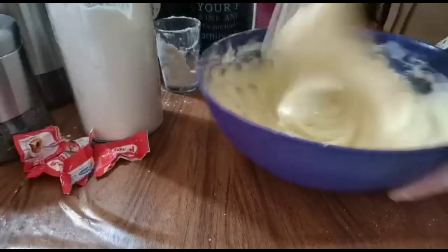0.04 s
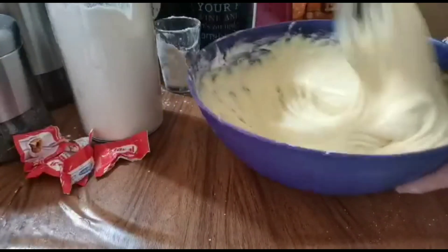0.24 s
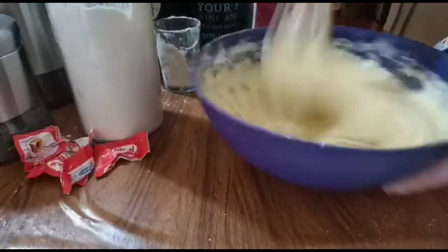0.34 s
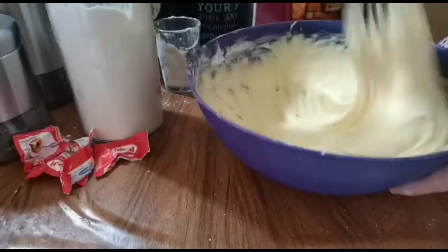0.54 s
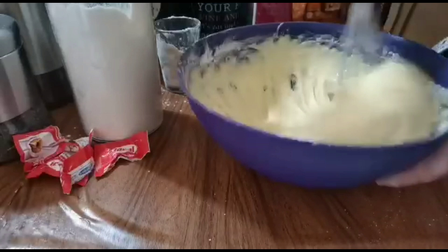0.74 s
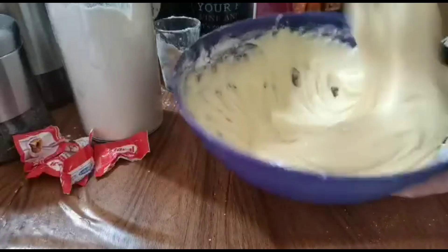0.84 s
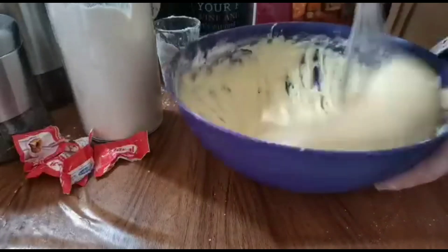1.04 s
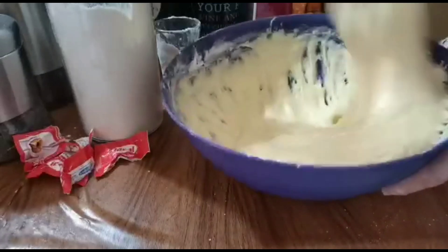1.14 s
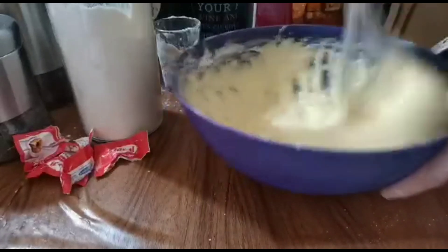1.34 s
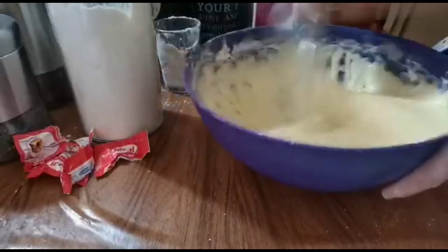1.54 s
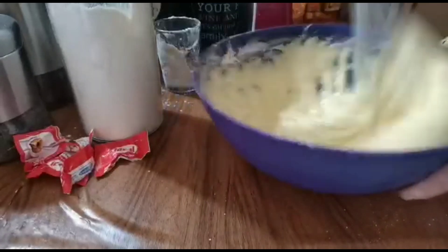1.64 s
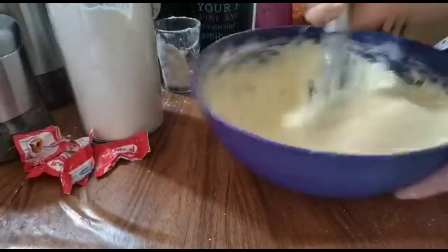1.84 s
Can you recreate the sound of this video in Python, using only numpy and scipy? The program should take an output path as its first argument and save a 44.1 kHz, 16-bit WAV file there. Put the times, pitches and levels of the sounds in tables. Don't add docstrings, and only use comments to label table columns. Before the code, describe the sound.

A wire whisk beats thick batter in a plastic bowl on a wooden table. Strokes land near 0.2, 0.5, 0.8, 1.08, 1.38 and 1.67 seconds, each with dull nudges, clustered snaps on the wall and a short wet slap. The hits at 1.08 and 1.38 are hardest; a softer knock comes near 1.9. Close stereo microphones catch short hollow ringing, lively kitchen reverberation and faint hum.

```python
import sys
import numpy as np
from scipy import signal
from scipy.fft import rfft, irfft, next_fast_len
from scipy.io import wavfile
from scipy.ndimage import map_coordinates

SR = 44100
rng = np.random.default_rng(int(sys.argv[2]) if len(sys.argv) > 2 else 0)


def makeup_ratio(level_db):
    decades = np.asarray(level_db, float) / 20
    return 10 ** decades


def master(y):
    cut = np.clip(np.atleast_2d(y).T, -1, 1)
    pcm = np.round(cut * 32767)
    wavfile.write(sys.argv[1], SR, pcm.astype(np.int16))


N = 83790
LEAD = 8192
M = N + LEAD


def along(points, hz):
    f, v = np.transpose(points)
    return np.interp(np.log(hz + 1), np.log(f + 1), v)


def filtered(x, response):
    n = x.shape[-1]
    m = next_fast_len(n + LEAD)
    spectrum = rfft(x, m) * response(np.fft.rfftfreq(m, 1 / SR))
    return irfft(spectrum, m)[..., :n]


def pair(n, alike):
    def mid_and_side(hz):
        turn = np.arccos(np.clip(along(alike, hz), -1, 1)) / 2
        return np.array([np.cos(turn), np.sin(turn)])

    mid, side = filtered(rng.standard_normal((2, n)), mid_and_side)
    return np.array([mid + side, mid - side])


def add(track, s, sound):
    part = track[..., LEAD + round(s * SR):][..., :sound.shape[-1]]
    part += sound[..., :part.shape[-1]]


# (f/Hz, level/dB per Hz)
HUM_SPECTRUM = [(15, -48), (25, 15), (206, -20), (503, -12), (607, -9), (6380, -33), (10100, -25),
                (14000, -41), (16000, -52)]
# (f/Hz, likeness 0 to 1)
ROOM_ALIKE = [(100, 0.93), (300, 0.96), (700, 0.2), (2000, 0.033), (10000, 0.017)]


def hum():
    noise = filtered(pair(M, ROOM_ALIKE), lambda hz: makeup_ratio(along(HUM_SPECTRUM, hz)))
    return makeup_ratio(-58.5) * noise / noise.std()


# (t/s, level/dB, hold/s, treble tilt/dB per octave)
SLAPS = [
    (-.07, -22.5, 0.027, -1.5),
    (0.2056, -31, 0.029, 2.5),
    (0.4936, -24.5, 0.0083, 3.5),
    (0.7846, -27, 0.016, 0.5),
    (1.0776, -30, 0.028, -8.5),
    (1.375, -20, 0.0085, 0.5),
    (1.6635, -30.5, 0.011, 0.5),
]
# (f/Hz, level/dB per Hz)
SPLAT = [(180, -65), (300, -9.5), (511, -3), (634, -12), (1190, -6), (4370, -15), (10200, -36.5),
         (13500, -28), (16000, -42)]


def batter():
    rise_s, fall_s = 0.0062, 0.032
    spits_per_s, spit_db = 700, 4
    out, t = np.zeros((2, M)), np.arange(SR // 5) / SR
    for s, db, hold_s, tilt_db in SLAPS:
        fall_db = 30 * np.maximum(t - hold_s, 0) / fall_s
        level = makeup_ratio(db - fall_db) * np.minimum(t / rise_s, 1)
        spit = map_coordinates(rng.standard_normal(spits_per_s), [t * spits_per_s])
        colour = lambda hz: makeup_ratio(along(SPLAT, hz) + tilt_db * np.log2(1 + hz / 2000))
        wet = filtered(pair(len(t), [(300, 1.0), (2000, 0.51), (9000, 0.13)]), colour)
        add(out, s, wet / wet.std() * makeup_ratio(spit_db * spit) * level)
    return out


# (f/Hz, t60/s)
KITCHEN_T60 = [(100, 0.82), (300, 0.51), (1000, 0.51), (3000, 0.52), (8000, 0.36), (14000, 0.34)]
# (f/Hz, level/dB)
WET = [(100, -12), (300, -11), (1000, -7), (3000, -7.5), (8000, -2), (14000, -2.5)]


def kitchen(x, count=8):
    out = np.zeros((2, M))
    for part in np.array_split(np.arange(M), count):
        hz, t, z = signal.stft(pair(SR // 2, ROOM_ALIKE), SR, nperseg=256)
        decay = makeup_ratio(-60 * t / along(KITCHEN_T60, hz)[:, None])
        tail = signal.istft(z * decay, SR, nperseg=256)[1]
        build_up = np.minimum(np.arange(tail.shape[1]) / SR / 0.0017, 1)
        tail = tail / np.linalg.norm(tail[0]) * build_up
        add(out, (part[0] - LEAD) / SR, signal.fftconvolve(x[None, part], tail, axes=1))
    return filtered(out, lambda hz: makeup_ratio(along(WET, hz)))


def ring(modes, t):
    contact_s = 0.00057
    hz, db, t60 = np.transpose(modes)[..., None]
    db = db + 1.5 * rng.standard_normal(hz.shape)
    sign = rng.choice([-1, 1], hz.shape)
    hz = hz * (1 + 0.01 * rng.standard_normal(hz.shape))
    sines = sign * makeup_ratio(db - 60 * t / t60) * np.sin(2 * np.pi * hz * t)
    x = np.sum(sines, axis=0) * (1 - np.exp(-t / contact_s))
    return x / np.abs(x).max()


# (t/s, peak level/dB, contact brightness f/Hz, belly over rim/dB)
NUDGES = [(.1135, -20.5, 1240, -1.5), (.159, -30.5, 600, 7), (.175, -35, 600, 5), (.194, -40, 600, 12),
          (.327, -32, 596, 9), (.339, -42, 584, -6), (.4515, -17.5, 1330, 1.5), (.469, -33.5, 800, 12),
          (.4835, -13, 1200, 2.5), (.7305, -15, 1200, -7), (.7435, -23.5, 1200, -4), (.7645, -21, 1090, 0),
          (1.0650, -11.5, 1560, -4), (1.0705, -15, 1270, -8), (1.1405, -16, 1420, -5),
          (1.3385, -17, 1330, -3), (1.3468, -12, 1620, -3.5), (1.6105, -20.5, 1250, -3),
          (1.6425, -27.5, 1000, 2.5), (1.722, -29.5, 895, -6), (1.8825, -23, 1000, 0),
          (1.8905, -16.5, 1060, -1.5)]
# (t/s, peak level/dB, contact brightness f/Hz, belly over rim/dB)
BLOWS = [(.2085, -17.5, 2000, -7.5), (.2185, -14.5, 2010, -39), (.2275, -11, 2160, -2.5),
         (.2515, -19.5, 1510, 3), (.4995, -8.5, 2420, -8), (.5065, -26, 1980, 11.5),
         (.5135, -15, 1600, -3.5), (.7910, -14, 2090, -9), (.8010, -14.5, 1980, 8), (.8195, -12, 1500, -11),
         (1.0793, -5.5, 1970, -5), (1.0920, -17, 1520, 3.5), (1.1000, -16.5, 1430, 4.5),
         (1.3752, -25, 2000, 8), (1.3795, -7, 2550, -1), (1.6742, -14.5, 2500, -10)]
# (f/Hz, level/dB, t60/s)
BELLY = [(106, -10, 0.05), (132.5, -8.5, 0.12), (148.4, -7, 0.065), (200.8, -4, .12), (226.8, -5.5, 0.089),
         (271.4, -5, 0.09), (310, -3, 0.064), (338, -6.5, 0.044)]
# (f/Hz, level/dB, t60/s)
RIM = [(426, -9.5, 0.065), (585, -0.5, 0.047), (627.8, 1, 0.097), (756, 1.5, 0.035), (847, 4.5, 0.031),
       (962.4, -1.5, 0.041), (1250, 4.5, 0.019), (1480, -5.5, 0.025), (1900, 0.5, 0.054),
       (2166, -10, 0.042)]


def bowl():
    knock_db, thud_db, thud_t60 = -8, -4.5, 0.063
    out, t = np.zeros(M), np.arange(SR // 4) / SR
    for s, db, soft_hz, belly_db in list(NUDGES) + list(BLOWS):
        thud = makeup_ratio(thud_db - 60 * t / thud_t60) * rng.standard_normal(len(t))
        body = ring(RIM, t) + makeup_ratio(belly_db) * ring(BELLY, t) + thud
        knock = filtered(body, lambda hz: 1 / (1 + 1j * hz / soft_hz) ** 2)
        add(out, s, makeup_ratio(db + knock_db) * knock)
    return out


# (t/s, peak level/dB, pitch f/Hz, left over right/dB)
SNAPS = [(.2085, -19, 3500, 0), (.2243, -14, 3200, 0), (.2310, -15, 2300, 0), (.260, -30, 6500, 0),
         (.4962, -15, 5000, 1), (.4998, -8, 1700, 0), (.5063, -16, 2500, 0), (.5755, -35, 6500, 2),
         (.5820, -30, 6000, 2), (.7922, -12, 1600, -1), (.8014, -13, 4500, 0), (.8168, -25, 2800, 0),
         (1.0652, -18, 2200, -4), (1.0793, -13, 1940, 0), (1.0845, -19, 3500, 0), (1.0928, -21, 3290, 0),
         (1.0985, -10, 3000, 0), (1.1125, -28, 6000, 0), (1.3468, -20, 2200, -2), (1.3753, -16, 1930, -2),
         (1.3790, -5, 2860, 1), (1.3842, -13, 3500, 1), (1.6670, -24, 2500, 0), (1.6740, -7, 2600, -1),
         (1.6836, -18, 3640, 0)]


def wires():
    snap_db, crack_db = -3, -2
    cycles, crack_s = 2.62, 0.0017
    halves = np.array([[0.5], [-0.5]])
    out, t = np.zeros((2, M)), np.arange(SR // 50) / SR
    for s, db, hz, pan_db in SNAPS:
        tone = makeup_ratio(-30 * t * hz / cycles) * np.sin(2 * np.pi * hz * t)
        crack = makeup_ratio(crack_db - 30 * t / crack_s) * pair(len(t), [(1000, 0.71), (8000, 0.12)])
        colour = lambda f: 1j * f / (1 + 0.5j * f / hz) ** 2 / (1 + 1j * f / 7000) ** 2
        snap = filtered((tone + crack) * (1 - np.exp(-t / 0.0003)), colour)
        peak = np.abs(snap.mean(axis=0)).max()
        add(out, s, makeup_ratio(db + snap_db + halves * pan_db) * snap / peak)
    return out


def scene():
    near = batter() + bowl() + wires()
    return (near + kitchen(near.mean(axis=0)) + hum())[:, LEAD:]


def band_limit(x):
    return signal.sosfilt(signal.butter(12, 16810, fs=SR, output="sos"), x)


# (f/Hz, left over right/dB)
PORTS = [(100, -1.2), (400, -3), (1000, -1), (4000, 0.5), (8000, 3.5), (12000, 6.5), (14000, 15)]
# (f/Hz, level/dB)
CAPSULE = [(25, -15), (90, 0.5), (9300, 2), (10200, -10.5), (12300, -6.5), (13000, -2.5), (15200, -3),
           (16300, -25)]


def record(dry):
    halves = np.array([[0.5], [-0.5]])
    mix = filtered(dry, lambda hz: makeup_ratio(halves * along(PORTS, hz) + along(CAPSULE, hz)))
    return band_limit(mix)


dry = scene()
out = record(dry)
master(out)
```